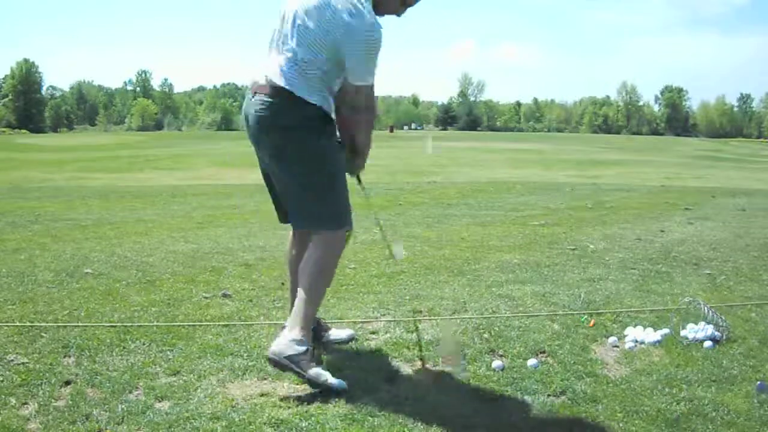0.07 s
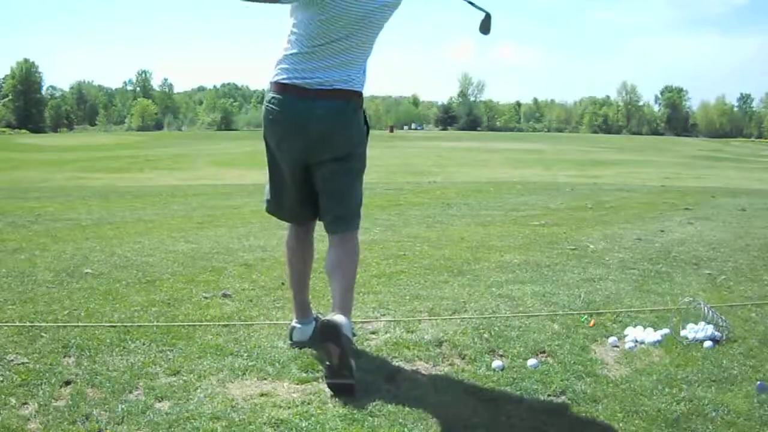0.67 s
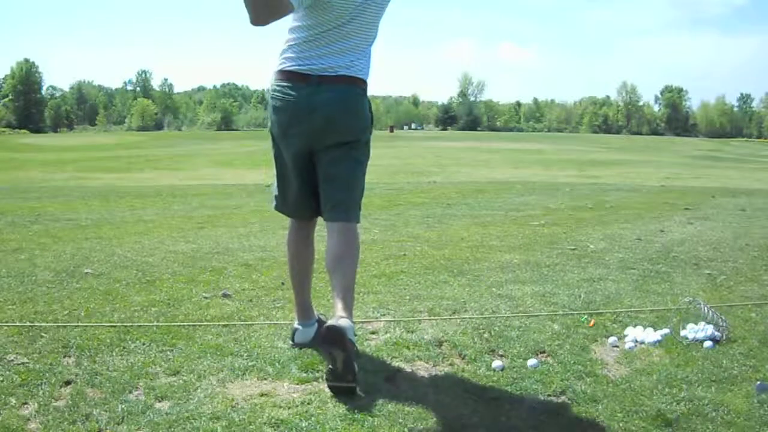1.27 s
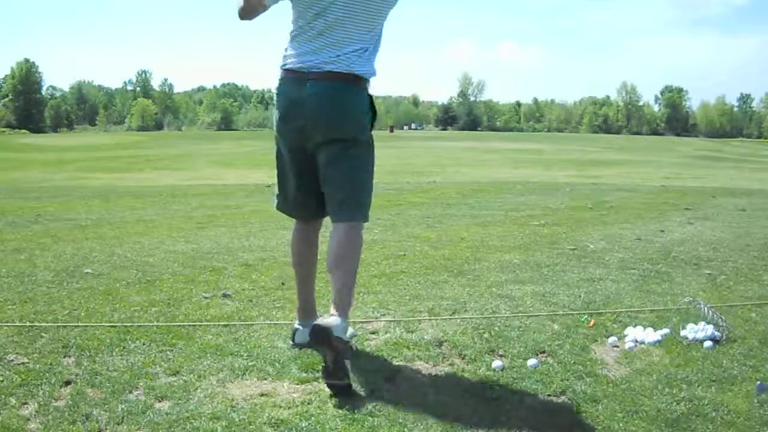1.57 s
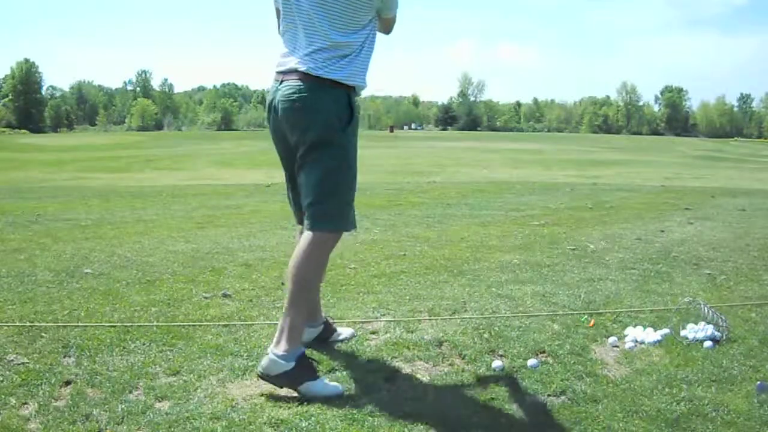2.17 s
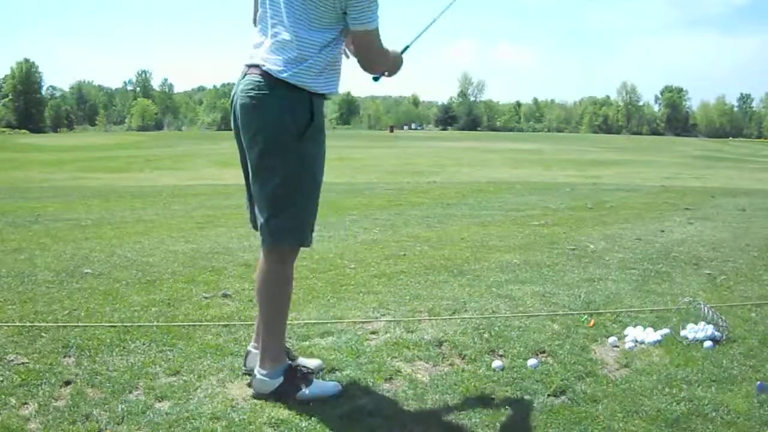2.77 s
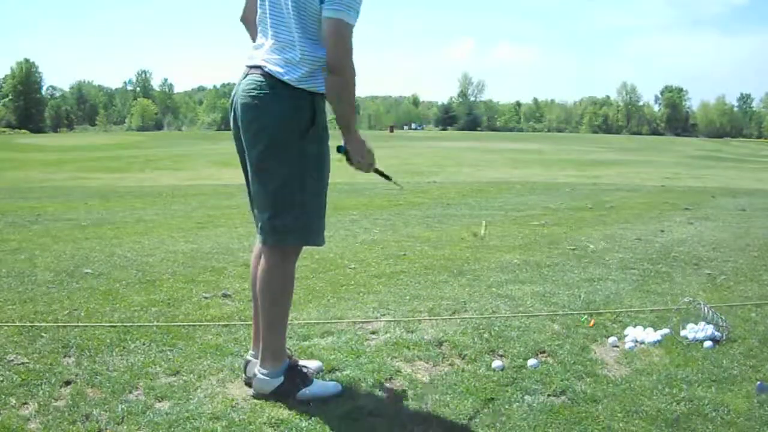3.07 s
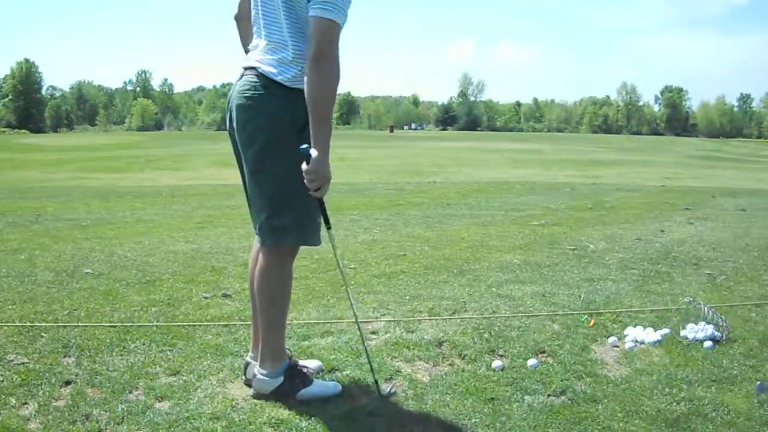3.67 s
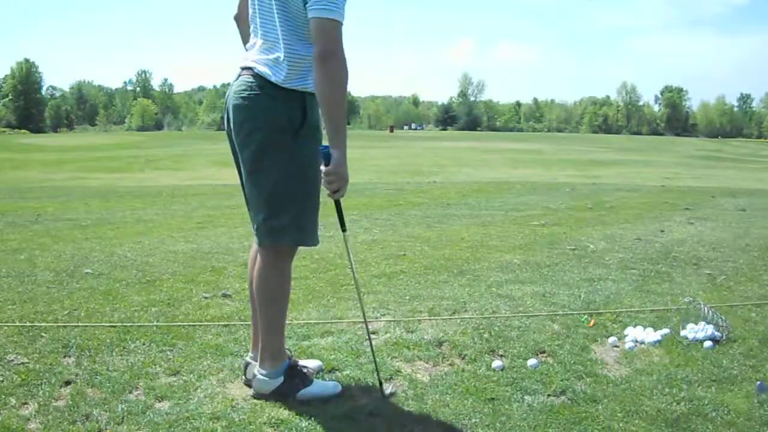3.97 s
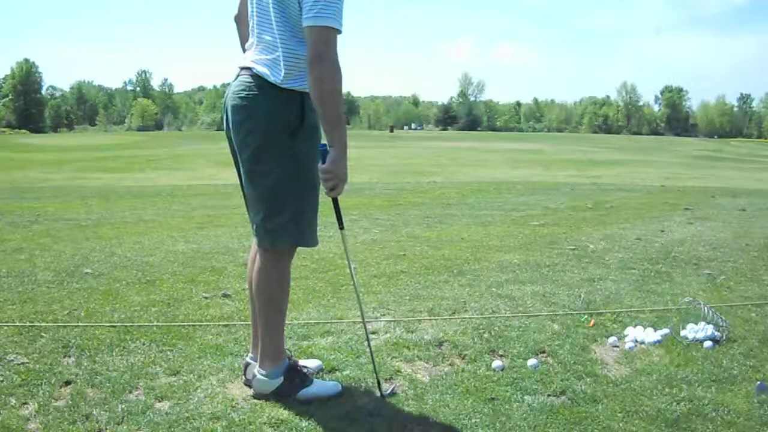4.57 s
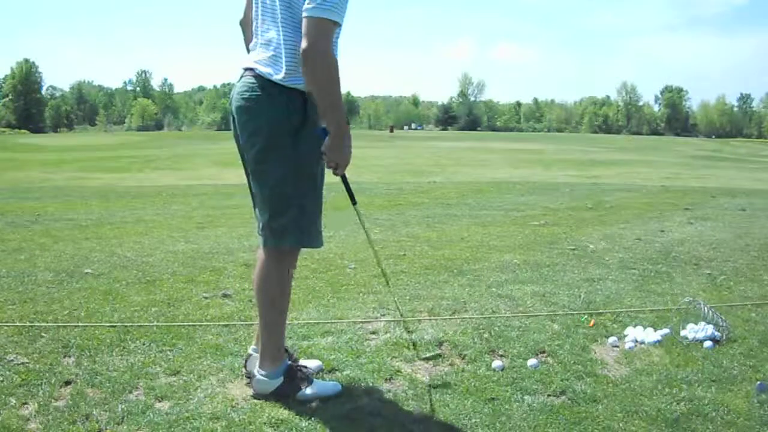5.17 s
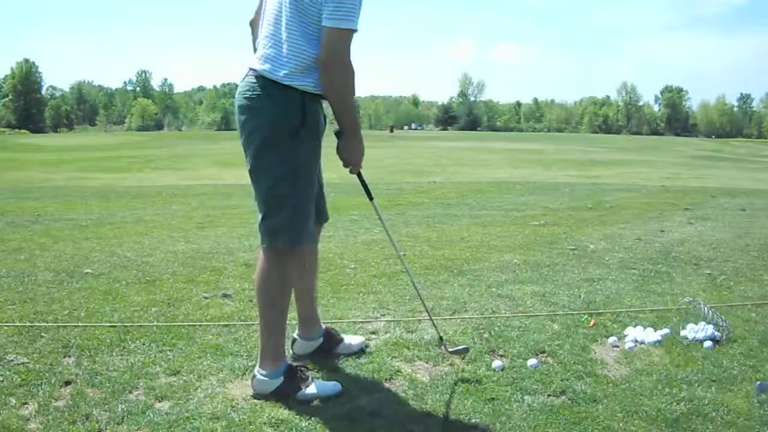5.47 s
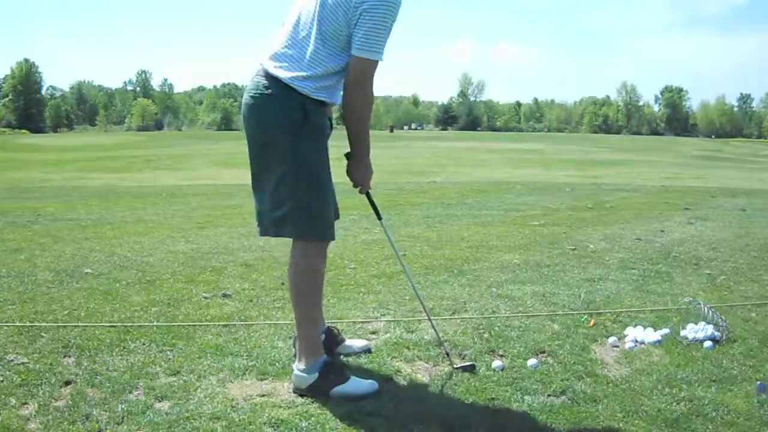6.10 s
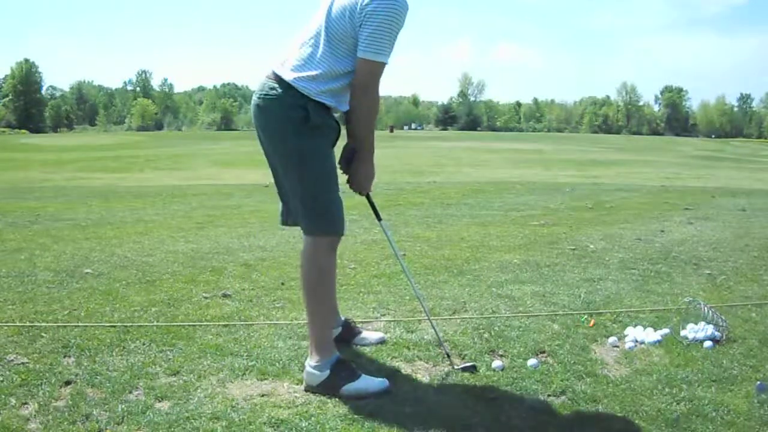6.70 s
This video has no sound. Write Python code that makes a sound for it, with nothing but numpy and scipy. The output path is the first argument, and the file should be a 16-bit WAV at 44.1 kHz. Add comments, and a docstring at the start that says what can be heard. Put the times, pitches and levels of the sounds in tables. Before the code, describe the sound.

Right at the start, a golf iron gives a short swish and hits the ball with a sharp, metallic crack and a brief scatter of turf. The close hit overloads the microphone, and the background dips, then slowly returns. A sparrow and other songbirds chirp across the open driving range over distant tyre noise, light wind and a faint engine drone. A few hollow knocks sound along the way.

```python
"""An open driving range: a golfer's iron sheds eddies in a short swish, then cracks against the ball,
rings and scatters turf. The crack overloads the microphone; its gain control ducks, holds and slowly lets
the surroundings back in. These are the tyre roar of a far road, the firing drone of an engine, light wind,
the gliding tones of a sparrow and other songbirds scattered by trees, and a few hollow, resonant knocks."""
import sys
import numpy as np
from scipy import signal
from scipy.fft import rfft, irfft, next_fast_len
from scipy.io import wavfile
from scipy.ndimage import minimum_filter1d

SR = 44100
rng = np.random.default_rng(int(sys.argv[2]) if len(sys.argv) > 2 else 0)


def wrap_up_sound(samples):
    """Save the sound to the file named by the first command line argument, as 16-bit audio."""
    columns = np.atleast_2d(samples).T
    # keep every value between -1 and 1, then stretch to whole-number steps
    tamed = np.clip(columns, -1, 1)
    steps = np.round(tamed * 32767).astype(np.int16)
    wavfile.write(sys.argv[1], SR, steps)


N = 306054
TIME = np.arange(N) / SR

# the club head meets turf, ball and turf again: start_s, crack_db, crack_t60_s, ring_db
CLUB_CONTACTS = [(0.0733, -13.5, .045, -26.5), (0.0763, 4.5, 0.035, 6), (0.0794, 1.5, 0.013, -15),
                 (0.083, 2, 0.016, -14), (0.0902, -7, .012, -32)]
# the sparrow's chirps: start_s, level_db
SPARROW_CHIRPS = [(0.433, -36.5), (1.242, -34), (1.914, -31.5), (2.622, -31), (3.22, -36), (3.964, -34),
                  (4.654, -36.5), (5.526, -34), (6.17, -33), (6.78, -34.5)]
# bird notes that sweep up and down: top_s, top_hz, rise_s, level_db
BIRD_TWEETS = [(.378, 4250, 0.019, -46), (.575, 4130, .03, -43.5), (1.742, 4500, 0.026, -40),
               (1.77, 4150, .005, -41), (1.832, 3900, 0.032, -40), (2.24, 3740, .03, -43.5),
               (3.278, 3900, 0.0043, -39), (3.398, 4530, 0.0048, -45), (3.46, 3980, 0.03, -39.5),
               (3.777, 5200, .005, -43), (3.947, 4070, .032, -34), (4.04, 4020, .027, -39),
               (4.063, 3650, 0.0082, -36), (4.212, 4550, 0.024, -34), (4.362, 4130, .032, -32),
               (4.742, 4020, 0.0088, -32), (4.812, 4580, 0.018, -42.5), (4.887, 4250, .02, -40),
               (4.937, 4750, 0.0075, -38), (4.99, 4010, .025, -38), (6.39, 4450, 0.021, -41),
               (6.44, 4230, 0.02, -37)]
# bird notes that fall and level off: start_s, length_s, first_hz, final_hz, level_db
BIRD_SLURS = [(.95, .07, 2875, 2620, -49), (1.42, 0.043, 2650, 2530, -46),
              (2.571, 0.054, 3050, 2550, -44.5), (2.878, 0.077, 2800, 2220, -45),
              (2.89, 0.049, 4500, 4140, -48), (3.065, .1, 3520, 2880, -43), (3.568, .11, 2535, 2330, -42),
              (3.691, .05, 2390, 2040, -47), (3.844, 0.088, 2510, 2370, -41.5),
              (4.151, 0.091, 2770, 2420, -41), (4.477, 0.078, 2770, 2280, -42.5),
              (4.973, 0.064, 4720, 4300, -36.5), (5.256, 0.026, 3190, 3020, -32),
              (5.29, 0.021, 4360, 3280, -38), (5.306, 0.088, 3400, 2880, -39.5),
              (5.506, .027, 3890, 3320, -37), (5.548, 0.023, 3170, 2800, -36),
              (5.721, 0.04, 4100, 3340, -39.5), (5.752, .046, 3150, 2520, -39)]
# bird notes that rise, hold and sag: start_s, length_s, held_hz, sag_share, level_db
BIRD_WHISTLES = [(1.469, 0.079, 3800, 0.012, -41), (2.725, 0.07, 3790, 0.16, -43),
                 (2.786, 0.031, 3950, 0, -40.5), (3.329, 0.11, 3560, 0, -39.5),
                 (3.779, 0.024, 3900, .02, -39.5), (4.503, 0.064, 3170, 0.22, -37.5),
                 (4.829, 0.036, 2850, 0.17, -38), (5.02, 0.048, 4420, 0.051, -38),
                 (5.169, 0.059, 3870, 0.039, -36), (5.582, .024, 3200, 0, -36),
                 (5.601, 0.056, 3930, 0.12, -34.5), (5.9, 0.039, 4400, 0.058, -42.5),
                 (5.995, 0.046, 4060, .02, -39.5)]


def from_db(db):
    """Amplitude grows tenfold for every 20 dB."""
    return 10 ** (np.asarray(db) / 20)


def unit_rms(x):
    """Dividing by the RMS gives unit power."""
    return x / np.sqrt(np.mean(x ** 2) + 1e-20)


def curves(rows):
    """Linear interpolation gives each column after the time a value at every sample."""
    times, *columns = np.transpose(rows)
    return [np.interp(TIME, times, column) for column in columns]


def lowpass(x, hz, order=2):
    """A causal Butterworth filter attenuates what lies above its cutoff."""
    return signal.sosfilt(signal.butter(order, hz, fs=SR, output="sos"), x)


def noise(spectrum, size=N):
    """Spectral shaping colours unit-power noise by rows of frequency_hz, density_db."""
    hz, db = np.transpose(spectrum)
    n = next_fast_len(size)
    bins_hz = np.maximum(np.arange(n // 2 + 1) * SR / n, 1)
    colour = from_db(np.interp(np.log(bins_hz), np.log(hz), db))
    skirts = np.minimum(1, bins_hz / hz[0]) ** 2 * np.minimum(1, hz[-1] / bins_hz) ** 8
    return unit_rms(irfft(rfft(rng.standard_normal(n)) * colour * skirts, n)[:size])


def drift(hz):
    """Low-passed noise gives a slow random fluctuation of unit RMS."""
    n = N // 16 + 2
    bins_hz = np.arange(n // 2 + 1) * SR / N
    slow = irfft(rfft(rng.standard_normal(n)) / (1 + (bins_hz / hz) ** 2), n)
    return np.interp(TIME, np.linspace(0, N / SR, n), unit_rms(slow))


def add(out, start_s, sound):
    """Superposition: a sound adds to the mix from its start time."""
    i = max(0, round(start_s * SR))
    out[i:i + len(sound)] += sound[:N - i]


def decay(t, t60_s):
    """Exponential damping loses 60 dB in t60_s."""
    return from_db(-60 * t / t60_s)


def swish():
    """Vortex shedding from the shaft and head makes noise as the club rushes down."""
    # loudness of the swing: time_s, level_db
    swing = [(0, -44), (.018, -28.5), (.05, -21), (.072, -26), (.095, -22.5), (.13, -39), (.18, -51)]
    # spectrum of the eddies: frequency_hz, density_db
    eddy_spectrum = [(60, -19), (130, -14), (300, -8), (550, 2), (850, -7), (1200, -2), (1750, -19),
                     (2600, -12), (4000, -13), (6500, -17.5), (7500, -25.5), (10000, -22), (12000, -41.5)]
    level_db, = curves(swing)
    return from_db(level_db) * noise(eddy_spectrum)


def road(half_width_hz=220, flutter_db=1.1):
    """Tyre roar is band-limited noise whose centre moves as far cars come and go."""
    # the roar of the traffic: time_s, centre_hz, level_db
    traffic = [(2.05, 833.2, -35), (2.52, 947.3, -36.5), (3.95, 855, -37), (4.12, 976.3, -37.5),
               (4.54, 807.2, -40.5), (5.14, 1020, -37), (5.54, 894, -43), (6.35, 1060, -39),
               (6.85, 1024, -43.5)]
    centre_hz, level_db = curves(traffic)
    baseband = lowpass(rng.standard_normal(N) + 1j * rng.standard_normal(N), half_width_hz)
    carrier = np.exp(2j * np.pi * np.cumsum(centre_hz) / SR)
    return from_db(level_db + flutter_db * drift(3.6)) * unit_rms(np.real(baseband * carrier))


def engine(waver_share=.006, throb_db=.1):
    """Periodic firing makes a harmonic series, of which only the lowest orders carry this far."""
    # engine speed: time_s, firing_hz
    speed = [(3.7, 70.64), (4.5, 70.76), (5.97, 73.47), (6.21, 75.76), (6.6, 76.3)]
    # loudness of the drone: time_s, fundamental_db, overtones_db
    loudness = [(0, -50.5, -52), (2.4, -44, -45.5), (3.5, -50.5, -41.5), (3.95, -34.5, -53),
                (4.4, -36.5, -38.5), (4.8, -34.5, -39.5), (5.8, -39.5, -38), (6.94, -43, -42.5)]
    # higher firing orders: multiple, relative_db
    overtones = [(2, -1.5), (3, -20.5), (4, -20)]
    firing_hz, = curves(speed)
    fundamental_db, overtones_db = curves(loudness)
    phase = 2 * np.pi * np.cumsum(firing_hz * (1 + waver_share * drift(5.3))) / SR
    orders = [(1, fundamental_db)] + [(k, overtones_db + db) for k, db in overtones]
    return np.sqrt(2) * sum(from_db(db + throb_db * drift(4.5)) * np.sin(k * phase) for k, db in orders)


def breeze(air_db=-38.5, wind_db=-39, lumps_db=.5, bump_db=9, bump_s=2, bump_width_s=.06):
    """Wind turbulence rumbles under an even hiss, with one short low bump, like a foot set down."""
    # outdoor hiss: frequency_hz, density_db
    air_spectrum = [(200, -2.5), (270, -5), (330, -4), (460, -4), (560, -9), (700, -7), (1300, -5),
                    (1700, -13.5), (2200, -14.5), (4000, -14), (6500, -19), (10000, -18.5), (11000, -31),
                    (12300, -32)]
    # wind rumble: frequency_hz, density_db
    wind_spectrum = [(20, -1.5), (35, -1.5), (70, -1), (110, -2), (180, -6), (240, -2), (320, -27)]
    bump = np.exp(-((TIME - bump_s) / bump_width_s) ** 2)
    rumble_db = wind_db + bump_db * bump + lumps_db * drift(4.2)
    return from_db(air_db) * noise(air_spectrum) + from_db(rumble_db) * noise(wind_spectrum)


def bird_tone(hz, waver_share):
    """Slight random frequency modulation makes a bird's near-pure tone unsteady."""
    unsteady = unit_rms(lowpass(rng.standard_normal(len(hz)), 260))
    return np.sqrt(2) * np.sin(2 * np.pi * np.cumsum(hz * (1 + waver_share * unsteady)) / SR)


def glide(length_s, start_hz, middle_hz, end_hz):
    """A frequency glide follows a parabola through three pitches while the note swells and fades."""
    u = np.linspace(-1, 1, int(length_s * SR))
    hz = middle_hz + (end_hz - start_hz) / 2 * u + ((start_hz + end_hz) / 2 - middle_hz) * u ** 2
    return (1 - u ** 2) ** .4 * bird_tone(hz, waver_share=.009)


def among_trees(x, scatter_db, t60_s, build_s=.0018):
    """Reflection adds a few echoes; scattering by trunks and leaves adds a thin tail."""
    # reflections from ground and trees: delay_s, level_db
    echoes = [(.014, -16), (.031, -14), (.047, -19)]
    t = TIME[:SR // 2]
    tail = rng.standard_normal(len(t)) * decay(t, t60_s) * (1 - np.exp(-t / build_s))
    response = from_db(scatter_db) * tail / np.linalg.norm(tail)
    response[0] = 1   # direct path
    for delay_s, db in echoes:
        add(response, delay_s, from_db([db]))
    return signal.fftconvolve(x, response)[:N]


def far_birds(count=260, low_hz=2700, high_hz=4400, spread_db=10, level_db=-50):
    """Scattering blurs the quick up and down sweeps of many distant birds into a steady twitter."""
    out = np.zeros(N)
    for k, (when, length, height, slope, arch, loud) in enumerate(rng.random((count, 6))):
        hz = low_hz * (high_hz / low_hz) ** height
        sweep = (.07 + .12 * slope) * (-1) ** k
        droop = .12 * arch
        note = glide(.015 + .03 * length, hz * (1 - sweep - droop), hz, hz * (1 + sweep - droop))
        add(out, (k + when) / (count + 1) * N / SR, from_db(spread_db * loud) * note)
    return from_db(level_db) * unit_rms(among_trees(out, scatter_db=-5.5, t60_s=.22))


def strike():
    """Impact excitation: every contact gives a broadband crack, and the hard ball rings the head most."""
    # modes of club head and ball: pitch_hz, level_db, t60_s
    modes = [(618, -5, .04), (880, -5.5, 0.037), (1356, 1, 0.025), (2360, -13.5, 0.056),
             (2830, -12.5, 0.04), (3450, -11.5, 0.083), (4024, -4, 0.027), (4940, -10, .034),
             (5590, -20, 0.031), (6030, -19, 0.045), (6660, -16.5, 0.033), (7600, -16, 0.029),
             (10000, -18.5, 0.025)]
    # spectrum of the crack: frequency_hz, density_db
    crack_spectrum = [(60, -14), (250, -1), (600, -2), (1500, 0), (1900, -9.5), (3600, -2.5), (6500, -3.5),
                      (7300, -17.5), (8200, -3), (10000, -18.5), (12000, -32)]
    out, t = np.zeros(N), TIME[:SR // 8]
    ring = sum((-1) ** k * from_db(db) * np.sin(2 * np.pi * hz * t) * decay(t, t60_s)
               for k, (hz, db, t60_s) in enumerate(modes))
    for start_s, crack_db, t60_s, ring_db in CLUB_CONTACTS:
        crack = noise(crack_spectrum, len(t)) * decay(t, t60_s)
        add(out, start_s, from_db(ring_db) * ring + from_db(crack_db) * crack)
    return out


def divot(level_db=-30.5, t60_s=.5, grains_per_s=3500, low_hz=1200, high_hz=6000):
    """Shot noise: torn grass and soil land as tiny random impacts after the last contact."""
    out, t = np.zeros(N), TIME[:SR // 2]
    grains = (rng.random(len(t)) < grains_per_s / SR) * rng.standard_normal(len(t))
    rustle = lowpass(grains - lowpass(grains, low_hz, order=1), high_hz)
    add(out, CLUB_CONTACTS[-1][0], from_db(level_db) * unit_rms(rustle) * decay(t, t60_s))
    return out


def ticks(t60_s=.02, low_hz=1800, high_hz=5400):
    """Heavily damped bursts of noise sound as tiny dry snaps."""
    # crumbs of turf and small ticks: start_s, level_db
    snaps = [(0.141, -27), (.204, -33), (0.341, -31), (2.356, -26)]
    out, t = np.zeros(N), TIME[:SR // 16]
    for start_s, db in snaps:
        add(out, start_s, from_db(db) * noise([(low_hz, 0), (high_hz, -5)], len(t)) * decay(t, t60_s))
    return out


def tweet(top_hz, rise_s, fall_s=.022, full_rise_s=.03, depth_share=.34, roundness=1.1):
    """A frequency sweep climbs to its top and drops again; a short rise starts close under the top."""
    t = TIME[:int((rise_s + fall_s) * SR)] - rise_s
    from_top = np.maximum(-t / full_rise_s, t / fall_s)
    hz = top_hz * (1 - depth_share * from_top ** roundness)
    envelope = (1 - np.linspace(-1, 1, len(t)) ** 2) ** .36
    return envelope * bird_tone(hz, waver_share=.011)


def slur(length_s, first_hz, final_hz):
    """A downward glide makes two thirds of its fall by halfway, then settles on its pitch."""
    return glide(length_s, first_hz, final_hz + .33 * (first_hz - final_hz), final_hz)


def songbirds(whistle_rise_share=.1083):
    """Frequency modulation shapes each near-pure note into a tweet, a slur or a whistle."""
    out = np.zeros(N)
    for top_s, top_hz, rise_s, db in BIRD_TWEETS:
        add(out, top_s - rise_s, from_db(db) * tweet(top_hz, rise_s))
    for start_s, length_s, first_hz, final_hz, db in BIRD_SLURS:
        add(out, start_s, from_db(db) * slur(length_s, first_hz, final_hz))
    for start_s, length_s, hz, sag_share, db in BIRD_WHISTLES:
        whistle = glide(length_s, hz * (1 - whistle_rise_share), hz, hz * (1 - sag_share))
        add(out, start_s, from_db(db) * whistle)
    return out


def call_blur(per_call=3, relative_db=-12.5, spread_db=5.5, early_s=.04, late_s=.08,
              low_hz=2900, high_hz=4900, longest_rise_s=.035):
    """Superposition: faint overlapping tweets blur around each near call."""
    out = np.zeros(N)
    calls = SPARROW_CHIRPS + BIRD_TWEETS + BIRD_SLURS + BIRD_WHISTLES
    for call_s, *_, db in calls * per_call:
        when, height, rise, faint = rng.random(4)
        note = tweet(low_hz * (high_hz / low_hz) ** height, rise * longest_rise_s)
        start_s = call_s - early_s + when * (early_s + late_s)
        add(out, start_s, from_db(db + relative_db - spread_db * faint) * note)
    return out


def sparrow(trail_after_s=.02, trail_db=-4):
    """Two frequency sweeps make each chirp, the first trailing off in a short slur."""
    # the syllables of a chirp: top_after_s, top_hz, rise_s, relative_db
    syllables = [(.016, 4870, .016, -6.5), (.092, 3955, .021, -4.5)]
    out = np.zeros(N)
    for start_s, db in SPARROW_CHIRPS:
        for top_after_s, top_hz, rise_s, relative_db in syllables:
            add(out, start_s + top_after_s - rise_s, from_db(db + relative_db) * tweet(top_hz, rise_s))
        trail = slur(length_s=.0231, first_hz=3740, final_hz=3380)
        add(out, start_s + trail_after_s, from_db(db + trail_db) * trail)
    return out


def near_birds(flutter_db=2.5, rasp_db=1.5):
    """Amplitude modulation roughens the near calls; the trees scatter them and the blur around them."""
    singers = sparrow() + songbirds()
    flutter = from_db(flutter_db * drift(73) + rasp_db * drift(280))
    return among_trees(singers * flutter + call_blur(), scatter_db=-9, t60_s=.23)


def knocks(rise_s=.00088, ring_db=4.5, ring_t60_s=.035, thud_db=-15, thud_t60_s=.13):
    """A soft blow excites one damped hollow resonance over a dull thud."""
    # hollow knocks: start_s, level_db, pitch_hz
    blows = [(1.7025, -16, 806), (1.7085, -16, 688), (1.727, -23, 725), (1.9465, -13, 700),
             (1.9565, -24.5, 794), (3.639, -25.5, 714), (4.4855, -22, 695), (4.739, -24.5, 924)]
    out, t = np.zeros(N), TIME[:SR // 8]
    onset = 1 - np.exp(-t / rise_s)
    for start_s, db, hz in blows:
        ring = from_db(ring_db) * decay(t, ring_t60_s) * np.sin(2 * np.pi * hz * t)
        thud = from_db(thud_db) * decay(t, thud_t60_s) * noise([(70, 0), (600, -3)], len(t))
        add(out, start_s, from_db(db) * onset * (ring + thud))
    return out


def scene():
    """The close shot and the range around it superpose in one channel."""
    shot = swish() + strike() + divot() + ticks()
    return (shot + knocks() + near_birds() + far_birds() + road() + engine() + breeze())[None]


def gain_control(x, threshold_db=-16.5, hold_s=.61, release_s=.98, attack_s=.0097):
    """Compression: a level above the threshold pulls the gain down; it is held, then creeps back."""
    power = signal.lfilter(np.ones(256) / 256, 1, x ** 2)
    level = np.sqrt(np.maximum(power, 1e-12))
    cut = np.maximum(1 - from_db(threshold_db) / level, 1e-9)   # share of the amplitude to remove
    half_hold = int(hold_s * SR / 2)
    # the deepest cut of the last hold_s, which then decays exponentially
    held = -minimum_filter1d(-cut, 2 * half_hold + 1, origin=half_hold, mode="constant")
    released = np.exp(np.maximum.accumulate(np.log(held) + TIME / release_s) - TIME / release_s)
    pole = np.exp(-1 / (attack_s * SR))
    log_gain = signal.lfilter([1 - pole], [1, -pole], np.log(1 - released))
    return x * np.exp(log_gain)


def record(dry, microphone_hz=11300, clip_level=.7, soften_hz=11000, cutoff_hz=16200):
    """Overload: the crack outruns a band-limited microphone's gain control and clips; filters round it."""
    ducked = gain_control(lowpass(dry[0], microphone_hz, order=10))
    clipped = np.clip(ducked, -clip_level, clip_level)
    softened = lowpass(clipped, soften_hz, order=1)
    return signal.fftconvolve(softened, signal.firwin(201, cutoff_hz, fs=SR), "same")[None]


dry = scene()
out = record(dry)
wrap_up_sound(out)
```